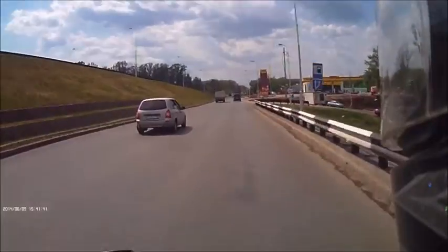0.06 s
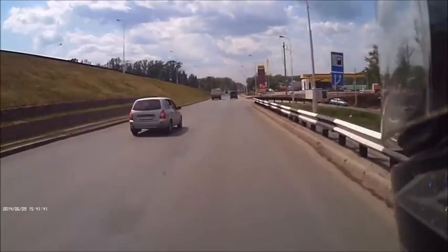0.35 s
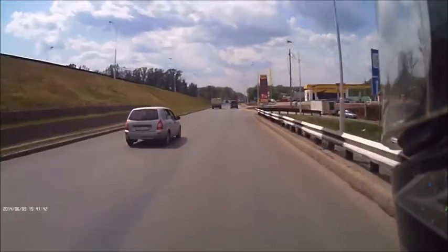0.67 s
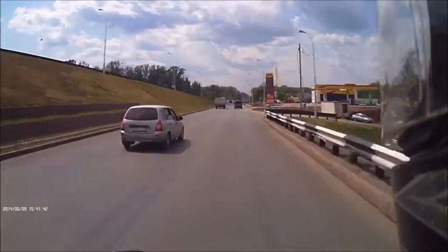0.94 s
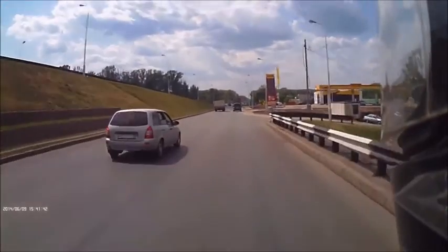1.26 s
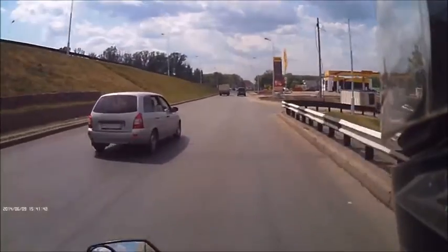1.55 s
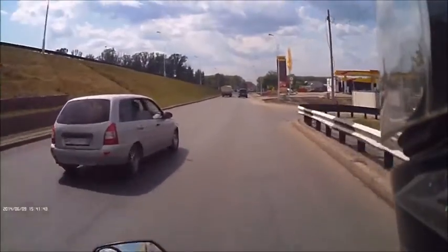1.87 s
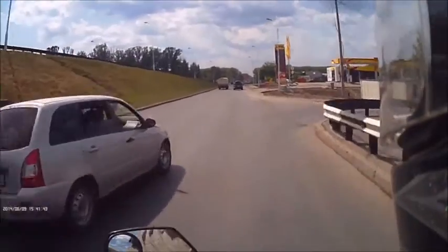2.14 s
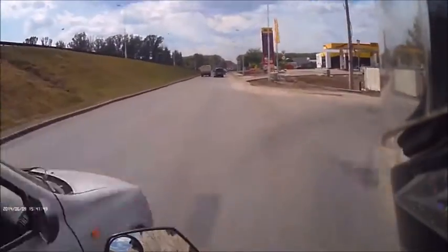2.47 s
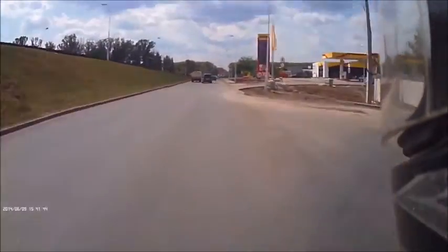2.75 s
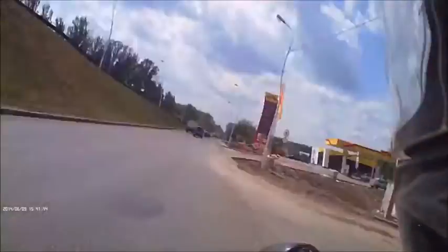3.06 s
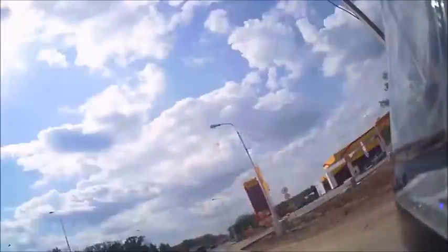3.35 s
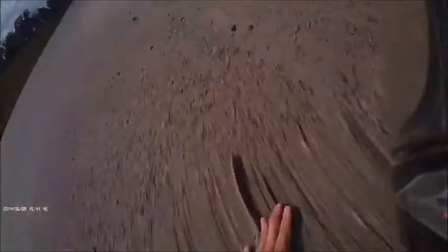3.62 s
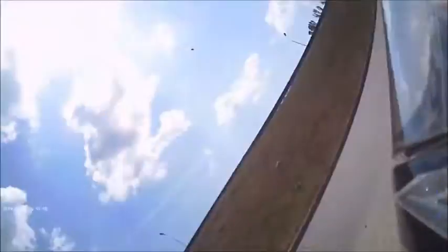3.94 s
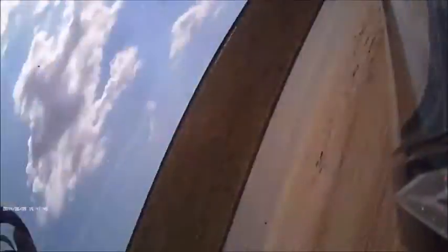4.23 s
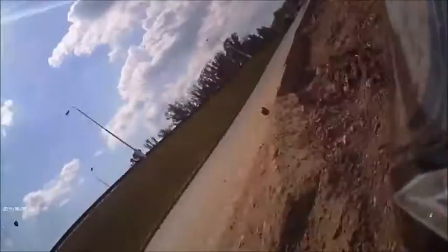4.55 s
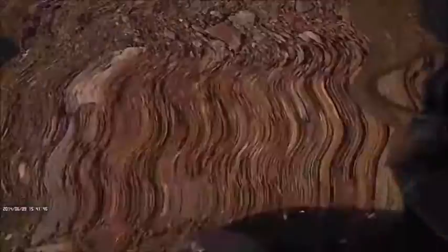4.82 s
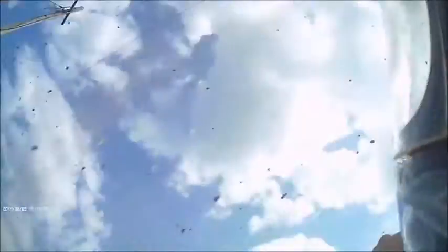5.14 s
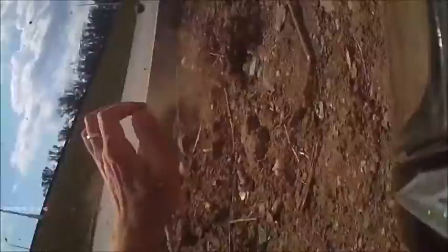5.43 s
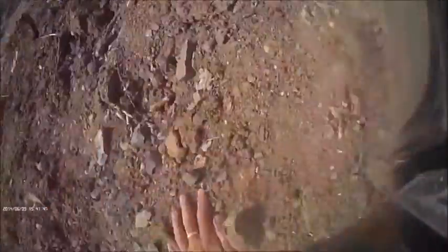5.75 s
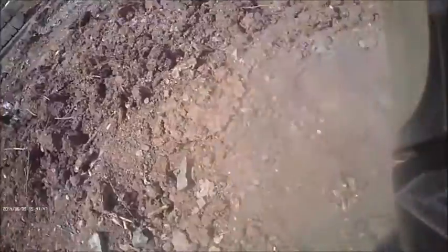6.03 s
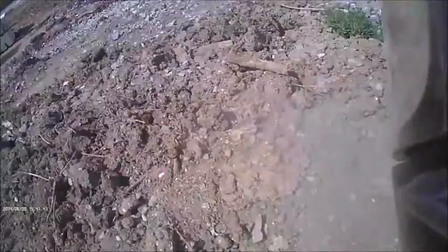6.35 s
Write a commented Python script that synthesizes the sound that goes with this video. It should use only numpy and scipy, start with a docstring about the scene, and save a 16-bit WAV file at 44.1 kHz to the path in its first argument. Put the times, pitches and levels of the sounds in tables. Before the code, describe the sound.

A motorcycle hums along quietly, bangs into a car, squeals and scrapes over asphalt, then heavy thuds and scattering grit follow.

```python
"""Motorcycle crash from the helmet

Air, road rumble and engine hum until the motorcycle hits a car turning across its path. Brake and tyre
squeal by stick-slip, panels ring under the blows, and the machine scrapes away over asphalt. The helmet
tumbles into stony earth, overloading its microphone twice; grit rains down and faint traffic remains."""
import sys
import numpy as np
from scipy import signal
from scipy.fft import rfft, irfft, next_fast_len
from scipy.io import wavfile

SR = 44100
rng = np.random.default_rng(int(sys.argv[2]) if len(sys.argv) > 2 else 0)


def wav_out(sig):
    """Save sig, one row per channel (or a flat mono array), as 16-bit PCM at SR to the path in sys.argv[1]."""
    wavfile.write(sys.argv[1], SR, np.round(np.clip(np.atleast_2d(sig).T, -1, 1) * 32767).astype(np.int16))


N = 290615
TIME = np.arange(N) / SR


def from_db(db):
    """Decibels to gain."""
    return 10 ** (np.asarray(db) / 20)


def unit_rms(x):
    """Scale to rms 1."""
    return x / np.sqrt(np.mean(x ** 2) + 1e-20)


def match_energy(x, reference):
    """Scale x to the energy of the reference."""
    return x * np.sqrt(np.sum(reference ** 2) / np.sum(x ** 2))


def drift(per_s):
    """Random wander, standard deviation 1."""
    knots = rng.standard_normal(8000)
    return np.interp(TIME * per_s, np.arange(len(knots)), knots) * np.sqrt(3 / 2)


def low_pass(x, hz, order=1):
    """Butterworth low-pass."""
    return signal.sosfilt(signal.butter(order, hz, fs=SR, output="sos"), x + 1e-18)


def coloured(x, spectrum):
    """Filter by an (f/Hz, level/dB) curve; rms 1."""
    hz, db = np.transpose(spectrum)
    size = next_fast_len(N)
    bins_hz = np.maximum(np.arange(size // 2 + 1) * SR / size, 1)
    gain = from_db(np.interp(np.log(bins_hz), np.log(hz), db))
    return unit_rms(irfft(rfft(x, size) * gain, size)[:N])


def resonate(x, modes):
    """Parallel resonators of alternating sign."""
    out = 0
    for k, (hz, width_hz, db) in enumerate(modes):
        r = np.exp(-np.pi * width_hz / SR)
        feedback = [1, -2 * r * np.cos(2 * np.pi * hz / SR), r * r]
        ring = (1 - r * r) / 2 * signal.lfilter([1, 0, -1], feedback, x + 1e-18)
        out += (-1) ** k * from_db(db) * ring
    return out


def grains(per_s, spread_db):
    """Random tiny contacts, a few much stronger than the rest; rms 1."""
    sizes = from_db(spread_db * np.minimum(rng.exponential(1, N), 4))
    return unit_rms(sizes * rng.choice([-1, 1], N) * (rng.random(N) < per_s / SR))


def add(track, start_s, sound):
    """Mix in a short sound."""
    start = round(start_s * SR)
    track[start:start + len(sound)] += sound[:N - start]


def phase_of(hz):
    """Running phase of a moving pitch."""
    return 2 * np.pi * np.cumsum(hz) / SR


def stroke(start_s, length_s, attack_s, release_s, fade_db_per_s):
    """Envelope of a rubbing contact: build up, fade, let go."""
    t = np.maximum(TIME - start_s, 0)
    fade = from_db(-fade_db_per_s * np.minimum(t, length_s))
    release = np.exp(-np.minimum(np.maximum(t - length_s, 0) / release_s, 50))
    return np.minimum(t / attack_s, 1) * fade * release


# helmet cavities: f/Hz, width/Hz, gain/dB
HOLLOW_MODES = [(40.26, 96, -7), (581, 26, 4), (1004, 50, 0), (1542, 60, -1.5), (1860, 110, -1),
                (2570, 150, -7), (3560, 220, -12.5), (4320, 200, -18.5)]

def traffic(down_s=5.4, level_db=-58.5, recede_db_per_s=7, hiss_db=-80):
    """Receding traffic through the helmet's hollows once the rider is down; faint hiss throughout."""
    far = unit_rms(resonate(rng.standard_normal(N), HOLLOW_MODES))
    gain = (TIME > down_s) * from_db(level_db - recede_db_per_s * (TIME - down_s))
    return gain * far + from_db(hiss_db) * rng.standard_normal(N)


# air resonances round the visor: f/Hz, width/Hz, gain/dB
VISOR_MODES = [(780, 51, -2), (1062, 87, 0.5), (1492, 91, 3.5), (1778, 92, 3), (2005, 260, -4.5),
               (2620, 260, -7.5), (3270, 220, -2), (3536, 300, -3), (4330, 260, -15), (4850, 230, -22),
               (6200, 500, -34.5), (7760, 640, -30.5), (8550, 400, -37.5)]
# air rush and road rumble: f/Hz, relative density/dB
AIR_SPECTRUM = [(180, -33.5), (300, -22), (574, -18), (749, 7.5), (900, -13), (1040, 3), (1320, -11),
                (1510, -8), (2210, -2.5), (3400, -5), (5430, -23.5), (7950, -29.5), (16000, -36.5)]
RUMBLE_SPECTRUM = [(20, -15), (60, -8), (110, -5), (150, -0.5), (210, 0), (270, -5.5), (400, -10.5),
                   (650, -13), (1500, -50.5)]
# a gust, then the car alongside: t/s, half width/s, rise/dB
RUSH_SWELLS = [(1.07, 0.15, 2.5), (2.3, 0.21, 3.5), (2.51, 0.025, 5.5), (2.95, 0.27, 5)]
# engine and drive: f/Hz, level/dB
ENGINE_TONES = [(138, -69), (217, -66), (420, -76)]

def riding(slows_from_s=4.31, fade_db_per_s=11.5, wander=0.028, throb_db=2):
    """Air rush, road rumble and wavering engine hum, dying away as the thrown rider slows."""
    visor = from_db(-4) * unit_rms(resonate(rng.standard_normal(N), VISOR_MODES))
    air = from_db(-9) * coloured(rng.standard_normal(N), AIR_SPECTRUM)
    rumble = from_db(-10) * coloured(rng.standard_normal(N), RUMBLE_SPECTRUM)
    swell_db = sum(db * np.exp(-((TIME - s) / width_s) ** 2) for s, width_s, db in RUSH_SWELLS)
    rush = from_db(swell_db - 52.5) * (visor + air + rumble)
    speed = 1 + wander * drift(11)
    hum = sum(from_db(db + throb_db * drift(23)) * np.sqrt(2) * np.sin(phase_of(hz * speed))
              for hz, db in ENGINE_TONES)
    return from_db(-fade_db_per_s * np.maximum(TIME - slows_from_s, 0)) * (rush + hum)


def squeal(bites, partials, jitter, shake_db, hoarse_db, overshoot=0, sag_hz_per_s=0, fade_db_per_s=0):
    """Stick-slip friction: an unsteady tone with a hoarse skirt round each partial."""
    attack_s, release_s = 0.006, 0.017
    swing_s, settle_s = 0.0517, 0.036
    hz, gain, tone = np.zeros(N), 0, 0
    for s, length_s, pitch_hz, db in bites:
        t = np.clip(TIME - s, 0, length_s + release_s)
        swing = overshoot * np.exp(-t / settle_s) * np.cos(2 * np.pi * t / swing_s)
        hz = np.where(TIME >= s, pitch_hz * (1 + swing) - sag_hz_per_s * t, hz)
        gain = np.maximum(gain, from_db(db) * stroke(s, length_s, attack_s, release_s, fade_db_per_s))
    phase = phase_of(hz * (1 + jitter * drift(650)))
    for k, db in partials:
        skirt = drift(240) * np.sin(k * phase) + drift(220) * np.cos(k * phase)
        partial = np.sqrt(2) * np.sin(k * phase) + from_db(hoarse_db) * skirt / k ** 2
        tone += from_db(db + shake_db * drift(160)) * partial
    return tone * gain


# t/s, length/s, f/Hz, gain/dB
BRAKE_BITES = [(2.425, 0.1, 2830, -53.5)]

def brake():
    """The brake sticks and slips in one brief squeak."""
    return squeal(BRAKE_BITES, [(1, -2)], jitter=0.006, shake_db=0.5, hoarse_db=-13)


# t/s, length/s, f/Hz, gain/dB
TYRE_BITES = [(3.202, 0.01, 986, -23.5), (3.225, 0.052, 1008, -37), (3.3, .148, 1018, -25.5)]
# harmonic number, gain/dB
TYRE_PARTIALS = [(1, -12), (2, -4), (3, -29.5), (4, -38)]

def tyre():
    """The skidding tyre bites, slips and bites again; each time the pitch overshoots and settles."""
    return squeal(TYRE_BITES, TYRE_PARTIALS, jitter=0.012, shake_db=1, hoarse_db=-5,
                  overshoot=0.041, fade_db_per_s=20)


# t/s, length/s, starting f/Hz, gain/dB
GRIND_BITES = [(3.36, .34, 966, -37.5)]

def grind():
    """A hoarse friction tone sinks as the sliding machine slows."""
    return squeal(GRIND_BITES, [(1, -12.5), (2, -12)], jitter=0.039, shake_db=3, hoarse_db=3,
                  sag_hz_per_s=560)


# f/Hz, relative density/dB
GRIT_SPECTRUM = [(1500, -27), (3500, 3), (4500, 9.5), (5400, -1.5), (8000, -3.5), (9500, -11), (12000, -8),
                 (16000, -24)]

def sliding(gains, spectrum, cavities, grains_per_s, judder_db, clump_db, hollow_db):
    """Countless contacts scrape, partly heard through helmet cavities; sparser grit crackles above."""
    scrape_gain, grit_gain = gains
    hollow = from_db(hollow_db) * unit_rms(resonate(grains(grains_per_s, spread_db=1), cavities))
    scrape = coloured(grains(grains_per_s, spread_db=2.5), spectrum) + hollow
    clumps = from_db(clump_db * drift(220))
    grit = clumps * coloured(grains(grains_per_s / 2, spread_db=2), GRIT_SPECTRUM)
    return from_db(judder_db * drift(130)) * (scrape_gain * scrape + grit_gain * grit)


def chirrs(start_s=2.8, span_s=1.8, low_hz=1600, high_hz=4400, tilt_db=-8, ring_s=0.0043, count=70):
    """Edges catch on the asphalt and sing briefly, each at its own pitch."""
    out, t = np.zeros(N), np.arange(3000) / SR
    swell = t / ring_s * np.exp(1 - t / ring_s)
    for when, pitch, strength in rng.random((count, 3)):
        hz = low_hz * (high_hz / low_hz) ** pitch
        gain = 2 * strength * from_db(tilt_db * pitch)
        add(out, start_s + span_s * when, gain * swell * np.sin(2 * np.pi * hz * t))
    return out


# t/s, scrape/dB, grit/dB
SLIDE_LEVELS = [(2.7, -95, -100), (3.2, -50, -68), (3.8, -43.5, -55.5), (4.05, -45, -63.5),
                (4.35, -43, -64.5), (4.62, -55.5, -73), (5.1, -63.5, -97.5), (5.9, -100, -110)]
# t/s, length/s, scrape/dB, grit/dB
EDGE_DIGS = [(2.803, 0.09, -39, -55.5), (3.445, 0.045, -34, -45), (3.51, 0.095, -33.5, -41.5),
             (3.618, 0.066, -37.5, -77), (3.876, 0.065, -34, -47.5), (4.213, 0.04, -40.5, -79)]
# f/Hz, relative density/dB
ASPHALT_SPECTRUM = [(88, -39), (150, -15), (533, -14), (701, -5), (1080, 3.5), (1390, -6), (1740, 2.5),
                    (2130, 2.5), (2370, -6), (2620, -1), (4380, -12.5), (5480, -28), (5970, -25),
                    (8260, -40), (9000, -40), (11700, -61), (19800, -120)]

def asphalt():
    """The machine slides over the road, louder where an edge digs in."""
    times_s, *curves_db = np.transpose(SLIDE_LEVELS)
    gains = from_db([np.interp(TIME, times_s, curve) for curve in curves_db])
    for s, length_s, *levels_db in EDGE_DIGS:
        dig = stroke(s, length_s, attack_s=0.026, release_s=0.031, fade_db_per_s=26)
        gains = np.hypot(gains, from_db(levels_db)[:, None] * dig)
    scrape = sliding(gains, ASPHALT_SPECTRUM, VISOR_MODES, grains_per_s=5000,
                     judder_db=1.5, clump_db=1.5, hollow_db=-11.5)
    return scrape + gains[0] * chirrs()


# t/s, length/s, soil/dB, grit/dB
EARTH_SPRAYS = [(4.638, 0.029, -46.5, -57.5), (4.842, 0.09, -51, -56), (5.043, 0.047, -42, -52.5),
                (5.269, 0.067, -58, -66.5), (5.423, 0.057, -37.5, -58), (5.5, 0.048, -53, -51),
                (5.571, 0.045, -48, -77), (5.657, 0.031, -52, -88), (5.8, 0.109, -61.5, -78),
                (6.275, 0.043, -67, -78)]
# f/Hz, relative density/dB
SOIL_SPECTRUM = [(80, -13), (200, -16), (350, -16.5), (580, 4), (800, -11), (1300, -8), (1850, -2),
                 (2200, -7.5), (2650, 4.5), (3100, -8.5), (3600, -1.5), (4400, -7), (5500, -21.5),
                 (12000, -36.5)]

def earth(attack_s=0.0086, release_s=0.018, fade_db_per_s=15, trickle_db=-8, trickle_s=0.09):
    """Each landing throws up loose earth; some trickles down afterwards."""
    gains = 0
    for s, length_s, *levels_db in EARTH_SPRAYS:
        spray = stroke(s, length_s, attack_s, release_s, fade_db_per_s)
        trickle = from_db(trickle_db) * stroke(s, length_s, attack_s, trickle_s, fade_db_per_s)
        gains = np.hypot(gains, from_db(levels_db)[:, None] * np.maximum(spray, trickle))
    return sliding(gains, SOIL_SPECTRUM, HOLLOW_MODES, grains_per_s=3000,
                   judder_db=3.5, clump_db=5, hollow_db=-5.5)


# t/s, length/s, starting peak/dB
STONE_SHOWERS = [(4.844, .045, -41), (5.077, .13, -35.5), (5.482, .11, -32), (5.829, .1, -53.5)]

def small_stones(gap_s=0.0099, fade_db_per_s=47.5, spread_db=3.5, count=20):
    """Stones fall in uneven, fading showers; rows of t/s, peak/dB."""
    rows = []
    for s, length_s, db in STONE_SHOWERS:
        delays_s = gap_s * (np.arange(count) + rng.random(count))
        peaks_db = db - fade_db_per_s * delays_s + spread_db * rng.standard_normal(count)
        rows += [(s + delay, peak) for delay, peak in zip(delays_s, peaks_db) if delay < length_s]
    return rows


# t/s, peak/dB
LARGE_STONES = [(4.654, -33), (4.828, -35), (4.848, -33), (4.8605, -25), (5.114, -34), (5.185, -36),
                (5.25, -40), (5.4755, -22), (5.5175, -21), (5.532, -20), (5.551, -20), (5.723, -37),
                (5.818, -45)]
# helmet shell: f/Hz, width/Hz, gain/dB
SHELL_MODES = [(120.3, 19, 2), (235, 80, -7), (366, 83, -4.5), (555, 89, 3), (754, 140, -2),
               (948, 180, 0.5), (1410, 320, -2.5), (1850, 180, 2.5), (2587, 230, 0.5), (3097, 92, 0.5),
               (3474, 140, 3), (4230, 230, 0), (6100, 600, -20), (8310, 720, -24.5), (11200, 3200, -25.5)]

def stones(tick_s=0.00022, direct_db=-17, high_pass_hz=3500, size=2000):
    """Stones tick against the helmet, stirring mainly the shell's upper modes."""
    out, t = np.zeros(N), np.arange(size) / SR
    for s, db in LARGE_STONES + small_stones():
        touch = rng.standard_normal(size) * np.exp(-t / tick_s)
        touch -= low_pass(touch, high_pass_hz)
        tick = resonate(touch, SHELL_MODES) + from_db(direct_db) * low_pass(touch, 9700, order=2)
        add(out, s, from_db(db) * tick / np.abs(tick).max())
    return out


# f/Hz, level/dB, t60/s
METAL_MODES = [(614, -17, .075), (1766, -21, .1), (2498, -19, .07), (3290, -18.5, .12), (3467, -25, .13),
               (4791, -22, .06), (11750, -31, .06), (15250, -35, .06)]
# t/s, gain/dB, mode floor/Hz
METAL_TAPS = [(5.029, 0.5, 300), (6.494, -38, 4500)]

def metal():
    """A small metal part on the helmet clangs; a light touch stirs only its high modes."""
    out, t = np.zeros(N), np.arange(SR // 4) / SR
    for s, tap_db, floor_hz in METAL_TAPS:
        for hz, db, t60_s in METAL_MODES:
            if hz > floor_hz:
                add(out, s, from_db(tap_db + db - 60 * t / t60_s) * np.sin(2 * np.pi * hz * t))
    return out


# t/s, level/dB, decay/s
BODY_BUMPS = [(3.121, -34, 0.082), (3.426, -48, 0.059), (3.884, -32.5, 0.059), (4.644, -47.5, 0.082),
              (4.917, -16, 0.047), (4.953, -16, 0.025), (5.28, -35.5, 0.034), (5.386, -30, .04),
              (5.52, -38.5, 0.027)]

def bumps(sway_hz=35, neck_hz=125, rise_s=0.0049, size=20000):
    """The rider's weight shakes the helmet on its padding."""
    out, t = np.zeros(N), np.arange(size) / SR
    for s, db, decay_s in BODY_BUMPS:
        force = (1 - np.exp(-t / rise_s)) * np.exp(-t / decay_s)
        shake = resonate(rng.standard_normal(size), [(sway_hz, 45, -2), (neck_hz, 70, -5)]) * force
        add(out, s, from_db(db) * match_energy(shake, force))
    return out


def blows(events, modes, release_s, rattle_db, rattle_s, shift_db, size=6000):
    """Each blow grinds during contact, then lets go with a short rattle."""
    out, t = np.zeros(N), np.arange(size) / SR
    for s, db, contact_s, bright_hz, floor_hz in events:
        after_s = np.maximum(t - contact_s, 0)
        force = np.exp(-after_s / release_s) + from_db(rattle_db) * np.exp(-after_s / rattle_s)
        crunch = low_pass(rng.standard_normal(size), bright_hz) * force
        ring = 0
        for k, mode in enumerate(modes):
            # the shifting contact point favours now one mode, now another
            favour = np.interp(t * 90, np.arange(64), rng.standard_normal(64))
            if mode[0] > floor_hz:
                ring += (-1) ** k * resonate(crunch * from_db(shift_db * favour), [mode])
        add(out, s, from_db(db) * match_energy(ring, force))
    return out


# t/s, level/dB, contact/s, low-pass/Hz, mode floor/Hz
MACHINE_BLOWS = [(2.18, -51, 0.027, 800, 0), (3.1213, -13.5, 0.0016, 3250, 300),
                 (3.127, -9.5, 0.0031, 1500, 0), (3.135, -28.5, .017, 700, 0),
                 (3.157, -30.5, 0.033, 7000, 600), (3.175, -25.5, 0.012, 2610, 500),
                 (3.431, -36, 0.0037, 500, 300), (3.888, -32.5, 0.029, 500, 200),
                 (3.94, -29.5, 0.0059, 1500, 300), (4.071, -23.5, 0.0034, 700, 400),
                 (4.3, -53, 0.02, 604, 0)]
# f/Hz, width/Hz, gain/dB
PANEL_MODES = [(134.2, 140, 0.5), (220, 140, 0), (501, 160, 2.5), (648, 230, 2.5), (863, 144, 10),
               (1153, 78, -6), (1330, 55, 0), (1820, 180, 3.5), (2595, 147, 6), (3290, 1860, -12.5),
               (4273, 140, -1), (5560, 470, -24), (8350, 630, -41.5), (11350, 2100, -29)]

def collision():
    """The motorcycle's panels ring as it strikes the car, then the road."""
    return blows(MACHINE_BLOWS, PANEL_MODES,
                 release_s=0.0021, rattle_db=-21.5, rattle_s=0.026, shift_db=3)


# t/s, level/dB, contact/s, low-pass/Hz, mode floor/Hz
HELMET_BLOWS = [(4.643, -44, 0.013, 7040, 6), (4.682, -39.5, 0.0059, 1200, -7),
                (4.747, -48, 0.0037, 603, 300), (4.9148, -5, .007, 3020, 0), (4.925, -9, .071, 3000, 4),
                (5.008, -6.5, 0.0025, 4000, 307), (5.014, -22, 0.02, 3200, 304),
                (5.279, -44.5, 0.02, 700, 0), (5.3815, -10.5, 0.014, 2496, 0),
                (5.411, -25.5, 0.0048, 2000, 300), (5.517, -38.5, 0.02, 500, 0),
                (5.72, -53, 0.0077, 4030, 300), (6.273, -54.5, 0.013, 7010, 296)]

def tumble():
    """The helmet's shell rings as it crunches into stony ground."""
    return blows(HELMET_BLOWS, SHELL_MODES,
                 release_s=0.0042, rattle_db=-32, rattle_s=0.013, shift_db=4.5)


def scene():
    """Ride, skid, collision and tumble, in mono."""
    friction = brake() + tyre() + grind() + asphalt() + earth()
    crash = collision() + tumble()
    return (friction + crash + riding() + bumps() + metal() + traffic() + stones())[None]


# helmet camera's sound port: f/Hz, width/Hz, gain/dB
PORT_MODES = [(4800, 250, -12.5), (6000, 350, -6), (8030, 410, -7.5)]
# cancellation between shell and camera: f/Hz, width/Hz, cancelled share/dB
SHELL_NOTCHES = [(883, 89, -7), (2330, 150, -8), (3090, 110, -11), (4000, 150, -9), (5400, 270, -7.5)]

def record(dry, overload=0.4, hardness=5, coupling_hz=14, cutoff_hz=15700):
    """Port and shell colour the sound; the microphone flattens peaks, its coupling tilts their tops."""
    heard = dry + sum(resonate(dry, [mode]) for mode in PORT_MODES)
    for notch in SHELL_NOTCHES:
        heard -= resonate(heard, [notch])
    clipped = heard / (1 + np.abs(heard / overload) ** hardness) ** (1 / hardness)
    coupled = clipped - low_pass(clipped, coupling_hz)
    return signal.sosfilt(signal.cheby1(12, 0.1, cutoff_hz, fs=SR, output="sos"), coupled)


dry = scene()
out = record(dry)
wav_out(out)
```